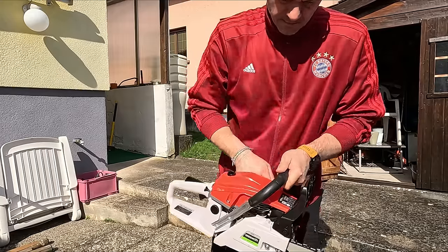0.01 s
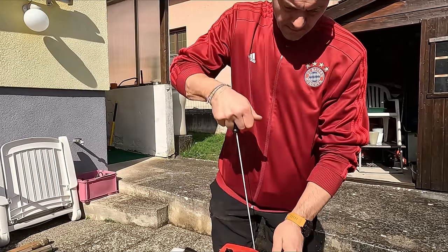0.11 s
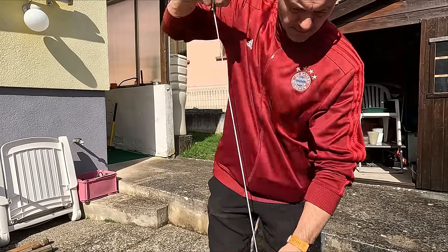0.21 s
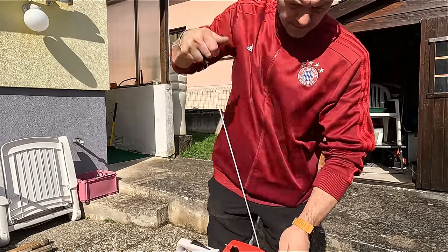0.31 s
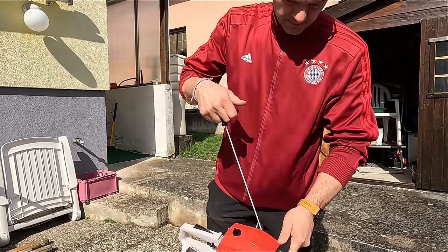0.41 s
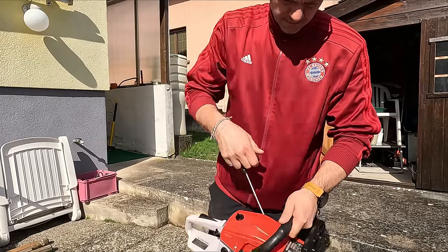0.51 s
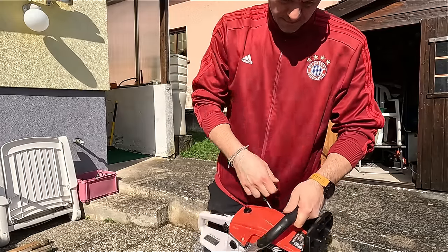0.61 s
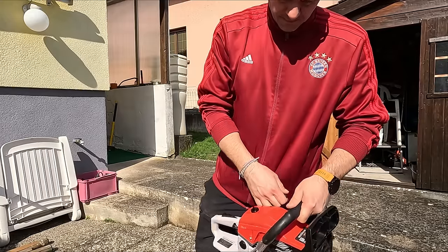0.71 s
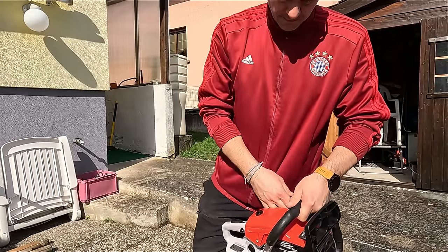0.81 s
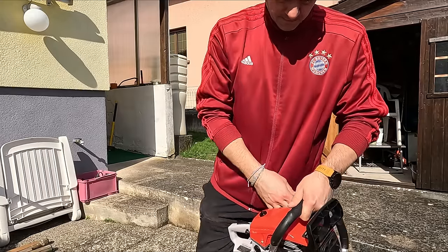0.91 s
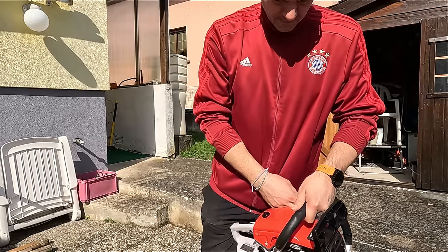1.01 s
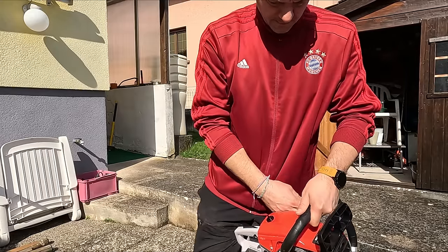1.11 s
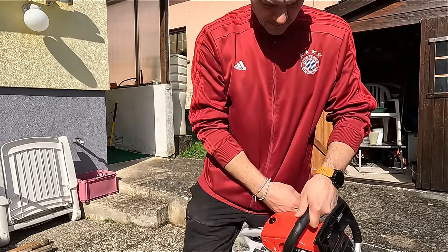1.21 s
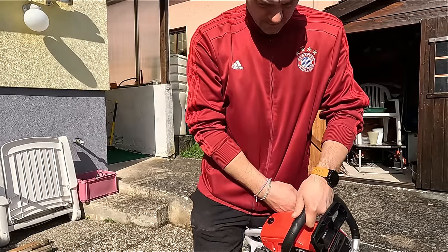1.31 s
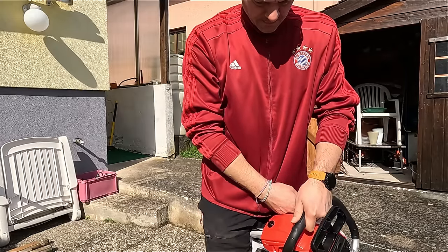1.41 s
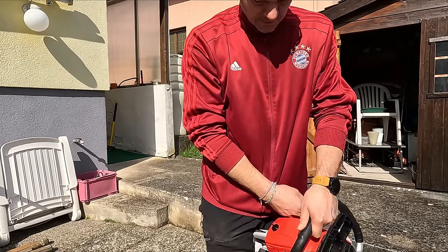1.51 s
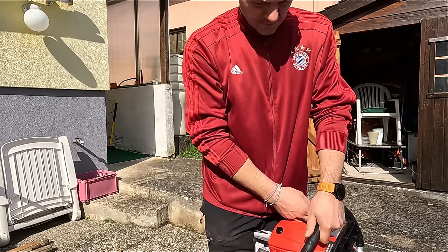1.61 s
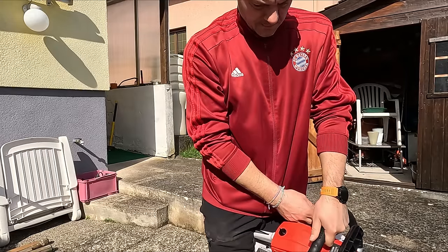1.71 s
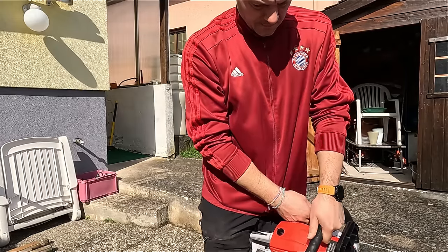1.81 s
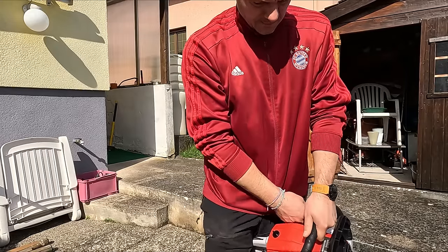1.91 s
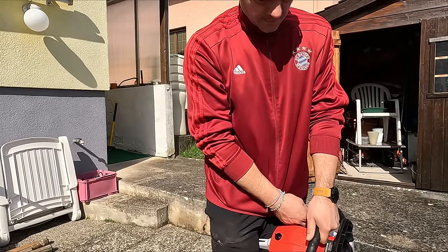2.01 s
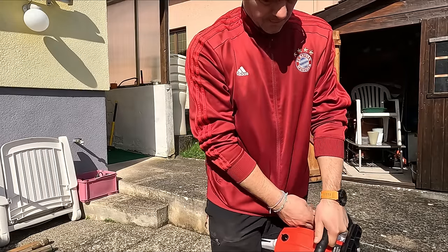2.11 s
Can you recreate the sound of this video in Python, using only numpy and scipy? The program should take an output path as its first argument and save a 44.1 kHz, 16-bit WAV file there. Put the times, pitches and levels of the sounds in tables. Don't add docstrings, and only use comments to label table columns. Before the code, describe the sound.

Small chainsaw starter rope yanked once: pawl click, hollow unfired chugs, rattly rewind, then rustling sleeves

```python
import sys
import numpy as np
from scipy import signal
from scipy.fft import rfft, irfft, next_fast_len
from scipy.io import wavfile
from scipy.ndimage import uniform_filter1d, map_coordinates

SR = 44100
rng = np.random.default_rng(int(sys.argv[2]) if len(sys.argv) > 2 else 0)


def store_wav(level_fs):
    pcm = np.round(np.clip(np.atleast_2d(level_fs), -1, 1) * 32767)
    wavfile.write(sys.argv[1], SR, pcm.T.astype(np.int16))


def boost(x):
    u = np.asarray(x, float) / 20
    return 10 ** u


N = 97020

# (port opens [s], level [dB], port stays open [s], muffler pitch [Hz])
PISTON_STROKES = [(0.23, -15, 0.01, 231), (0.2606, -3.5, 0.015, 222), (.289, -3, 0.0099, 236),
                  (0.3147, -5.5, 0.0109, 235), (0.3447, -6, 0.012, 252), (0.39, -8.5, 0.019, 182.4),
                  (0.408, -10.5, 0.013, 167), (0.447, -11, 0.027, 231), (0.494, -21, 0.019, 127),
                  (0.537, -24, 0.02, 83), (0.588, -25.5, 0.018, 95), (.628, -38.5, .02, 82.7)]
# (frequency [Hz], level [dB])
PUFF_COLOUR = [(150, -29), (400, -7), (900, -17.5), (2500, -26), (9000, -74)]
# (time [s], level [dB], pitch [Hz], T60 [s])
HOUSING_KNOCKS = [(0, -24.5, 1464, 0.059), (.1058, -13.5, 1650, .016), (.111, -25.5, 770, 0.029),
                  (.1205, -18, 2290, 0.014), (.1689, -14, 2620, 0.023), (.1705, -27, 1030, 0.043),
                  (.1785, -15.5, 2250, 0.038), (.204, -16.5, 3070, 0.024), (.2105, -17.5, 1387, 0.041),
                  (.2238, -25, 2500, 0.03), (.2307, -29, 2720, 0.018), (.2377, -10, 2300, 0.022),
                  (.2542, -14, 2480, 0.028), (.2595, -14, 864, .015), (.2806, -13, 3720, 0.023),
                  (.3066, -16, 3500, 0.017), (.3121, -14, 4200, 0.053), (.338, -17, 3000, 0.013),
                  (.383, -24, 1550, 0.026), (.5038, -22, 1760, 0.016), (.5092, -17.5, 1650, 0.038),
                  (.526, -20.5, 3770, 0.017), (.5285, -15.5, 1800, 0.025), (.5452, -14.5, 1130, .03),
                  (.569, -21, 1900, 0.029), (.5975, -20, 1724, 0.061), (.5985, -18.5, 3200, 0.024),
                  (.628, -19.5, 1640, 0.024), (.631, -20, 6200, .02), (.6672, -17, 1070, .035),
                  (0.668, -23, 6030, 0.029), (.6885, -28, 755, 0.026), (.7135, -21.5, 1590, 0.018),
                  (.717, -25.5, 695, 0.08), (.72, -20, 6100, 0.027), (.798, -20, 2350, 0.032),
                  (.8005, -21.5, 3220, 0.033), (.8098, -18.5, 3260, 0.05), (.811, -41, 1150, 0.033),
                  (.823, -39.5, 740, .05)]
# (time [s], pawl level [dB], spring level [dB], cup level [dB], free to ring [s])
STEEL_STRIKES = [(0, -26, -31, -40, .005), (.112, -21, -31, -36, .015), (.179, -15, -50, -44, .009),
                 (.384, -27, -11, -29, .011), (.397, -26, -21, -32, .018), (.42, -28, -12.5, -30, .014),
                 (.436, -36, -28, -29, .02), (.51, -38, -33, -35, .015), (.527, -34, -31, -31, .04),
                 (.555, -38, -28, -36, .015), (.57, -33, -24, -28.5, .045), (.63, -32, -25, -41, .022),
                 (.668, -28, -23, -40, .017), (.716, -24, -22, -34, .045), (.811, -40, -30, -34, .018)]
# (frequency [Hz], level [dB], T60 [s])
PAWL_MODES = [(5170, -3, .045), (6940, -16, .05), (10720, -21, .2), (13230, -33, .2), (6250, -22, .06)]
# (frequency [Hz], level [dB], T60 [s])
SPRING_MODES = [(4350, -2.5, .15), (3835, -12, .2), (3605, -17, .2), (3330, -18, .08), (740, -18, .42),
                (1100, -17.5, .1)]
# (frequency [Hz], level [dB], T60 [s])
CUP_MODES = [(7882, -2.5, .14), (8735, -13, .14), (9055, -11, .1), (10250, -18, .14), (10680, -15, .2),
             (11300, -25, .15), (12200, -27, .15), (12700, -28, .15), (13200, -26, .2), (13800, -32, .15)]
# (frequency [Hz], level [dB])
SCRAPE_COLOUR = [(380, -61), (560, 9.5), (1800, 4.5), (4200, 5.5), (9000, -11.5), (13500, -15.5),
                 (15500, -67)]
# (time [s], level [dB])
ROPE_SPEED = [(.17, -47), (.2, -31), (.26, -25.5), (.33, -20.5), (.43, -24.5), (.47, -36), (.53, -31.5),
              (.68, -33.5), (.79, -47)]
# (frequency [Hz], level [dB])
WHIR_COLOUR = [(350, -13.5), (650, 0), (1700, -0.5), (2700, -1), (5500, -8.5), (8000, -13), (13500, -39),
               (15500, -62)]
# (time [s], level [dB], length [s], pitch [Hz])
FINGER_TAPS = [(0.934, -50, 0.0028, 1790), (.961, -42.5, 0.0063, 1230), (1.987, -29.5, 0.0015, 2470),
               (1.9877, -37, 0.0039, 1230), (1.99, -38, 0.0022, 2600), (1.9965, -32, .002, 2390),
               (1.997, -42, 0.002, 1010), (2.002, -34.5, 0.012, 1150), (1.999, -33.5, 0.02, 2620),
               (2.074, -40, .004, 2770), (2.076, -40, .005, 1210), (2.092, -37.5, 0.017, 2760)]
# (middle [s], level [dB], half
# length [s], pitch [Hz])
SWISHES = [(0.211, -31.5, 0.0089, 557), (0.235, -22, 0.0082, 527), (.255, -20.5, 0.03, 2586),
           (0.32, -24, .008, 6900), (0.344, -30, 0.013, 7160), (0.409, -34, 0.019, 530),
           (0.445, -32, 0.0094, 576), (0.553, -36, 0.033, 600), (0.611, -34, 0.013, 580),
           (0.746, -38, 0.016, 736), (1.227, -48, 0.022, 6300)]
# (frequency [Hz], left minus right [dB])
SAW_TILT = [(60, -0.3), (380, -1), (2380, -2.1), (6000, -1), (15000, 3.5)]
# (frequency [Hz], left leads by [rad])
SAW_LEAD = [(100, 0.055), (1000, -0.23), (5000, -0.76), (10000, 0.05), (12500, -1.5)]
# (frequency [Hz], T60 [s])
WALL_DECAY = [(200, 0.55), (2000, 0.098), (10000, 0.05)]
# (time [s], level [dB])
SLEEVE_MOVES = [(0, -37), (.09, -46), (.86, -75), (.93, -52), (.96, -51.5), (1.1, -50.5), (1.13, -53),
                (1.2, -62), (1.225, -46.5), (1.27, -48.5), (1.33, -45.5), (1.42, -53), (1.54, -46),
                (1.57, -58), (1.88, -54), (1.94, -46), (2.08, -46), (2.2, -47)]
# (frequency [Hz], level [dB])
CLOTH_COLOUR = [(150, 7), (350, 4.5), (1200, 6.5), (3200, 2.5), (5500, -3), (8500, -5.5), (10500, -18),
                (13000, -47)]
# (time [s], level [dB])
GUSTS = [(0.0, -40), (0.18, -52), (0.21, -40), (0.54, -29.5), (0.79, -47), (0.84, -31), (0.88, -45),
         (0.99, -36.5), (1.05, -43), (1.4, -42.5), (1.46, -26.5), (1.49, -36), (1.75, -35), (1.78, -40.5),
         (1.91, -34), (1.96, -45.5), (2.13, -37.5), (2.2, -38)]
# (frequency [Hz], level [dB])
BUFFET_COLOUR = [(12, -11.5), (25, -2.5), (60, -7), (120, -18.5), (250, -39), (600, -71)]
# (frequency [Hz], level [dB])
YARD_COLOUR = [(80, -22), (130, -5), (330, -14.5), (600, -15), (1000, -12.5), (2000, -19.5), (4500, -28.5),
               (9000, -40.5), (13000, -66)]
# (frequency [Hz], left-right likeness [0-1])
YARD_LIKENESS = [(100, 1), (400, 0.81), (2400, 0.36)]


def unit(x):
    return x / np.sqrt(np.mean(x ** 2) + 1e-20)


def along(points, hz):
    f, v = np.transpose(points)
    return np.interp(np.log(hz + 1), np.log(f + 1), v)


def curve(rows):
    s, db = np.transpose(rows)
    before = -120 if s[0] > 0.05 else None
    after = -120 if s[-1] < 2 else None
    return np.interp(np.arange(N) / SR, s, db, left=before, right=after)


def wobble(rate):
    knots = rng.standard_normal(int(N * rate / SR) + 4)
    return map_coordinates(knots, [np.arange(N) * rate / SR])


def filtered(x, response):
    m = next_fast_len(N + SR // 2)
    return irfft(rfft(x, m) * response(np.fft.rfftfreq(m, 1 / SR)), m)[..., :N]


def rush(colour, alike, patchy_db, grain_db=0):
    raw = rng.standard_normal((2, N)) * boost(grain_db * wobble(900))
    z = signal.stft(raw, nperseg=512)[2]
    patches = uniform_filter1d(rng.standard_normal(z.shape[1:]), 6, axis=0)
    patches = uniform_filter1d(patches, 8, axis=1)
    pair = signal.istft(z * boost(patchy_db * unit(patches)), nperseg=512)[1][:, :N]

    def mid_side(hz):
        angle = np.arccos(np.clip(along(alike, hz), -1, 1)) / 2
        return boost(along(colour, hz)) * [np.cos(angle), np.sin(angle)]

    mid, side = filtered(pair, mid_side)
    return unit(np.array([mid + side, mid - side]))


def add(track, s, x):
    part = track[max(round(s * SR), 0):][:len(x)]
    part += x[:len(part)]


def hollow(hz, width, shape):
    raw = shape * rng.standard_normal(len(shape)) * boost(3 * wobble(900)[:len(shape)])
    raw[:3] += 4 * shape[0]
    broad = signal.lfilter(*signal.iirpeak(hz, 0.7, fs=SR), raw)
    out = signal.lfilter(*signal.iirpeak(hz, 1 / width, fs=SR), broad)
    return out / np.abs(out).max()


def piston():
    open_t60, shut_t60 = 0.26, 0.05
    blow_s, steady = 0.0077, 0.49
    suck_turns, suck_db, shut_db, puff_db = 0.46, 1.5, -8, -16
    overtone_db, overtone_t60 = -12.5, 0.064
    case_hz, case_db, case_t60 = 126.9, -14, 0.25
    low_hz = 69
    tone, gate, t = np.zeros(N), np.zeros(N), np.arange(SR // 8) / SR
    for s, db, open_s, hz in PISTON_STROKES:
        fade = boost(-60 * np.minimum(t, open_s) / open_t60 - 60 * np.maximum(t - open_s, 0) / shut_t60)
        fade *= steady + (1 - steady) * np.exp(-(t / blow_s) ** 2)
        turn = 2 * np.pi * hz * t
        overtone = boost(overtone_db - 60 * t / overtone_t60) * np.sin(2 * turn)
        case = boost(case_db - 60 * t / case_t60) * np.sin(2 * np.pi * case_hz * t)
        blow = fade * (np.sin(turn) + overtone) + case
        suck_s = suck_turns / hz
        suck = -boost(suck_db) * np.sin(np.pi * np.clip(t / suck_s, 0, 1))
        add(tone, s - suck_s + 0.0012, boost(db) * suck)
        add(tone, s + 0.001, boost(db) * blow)
        add(tone, s + open_s, boost(db + shut_db) * suck * 2)
        add(gate, s - suck_s, boost(db + puff_db) * fade)
    puff = gate * unit(filtered(rng.standard_normal(N), lambda hz: boost(along(PUFF_COLOUR, hz))))

    def bass_limit(hz):
        return hz / (hz - 1j * low_hz) * hz ** 4 / (hz ** 4 + low_hz ** 4)

    return filtered(tone + puff, bass_limit)


def ringing(modes, t):
    out = 0
    for hz, db, t60 in modes:
        level = db + rng.normal(0, 1) + 1.2 * wobble(90)[:len(t)] - 60 * t / t60
        phase = rng.uniform(0, 2 * np.pi) + 0.33 * wobble(145)[:len(t)]
        out = out + boost(level) * np.sin(2 * np.pi * hz * t + phase)
    return out


def steel_response(f):
    out = 0
    for hz, db, t60 in SPRING_MODES + PAWL_MODES + CUP_MODES:
        damping = 1j * f * 4 / t60
        out = out + boost(db) * damping / (hz * hz - f * f + damping)
    return out


def knocks_and_scrapes():
    taut_s, slack_s, tight_db = 0.2, 0.38, -8
    knock_db, scrape_db, scrape_t60, scrape_rise_s = -0.5, -16, 0.092, 0.00052
    body, scrape, t = np.zeros(N), np.zeros(N), np.arange(SR // 6) / SR
    for s, db, hz, t60 in HOUSING_KNOCKS:
        width = np.clip(0.14 * 0.025 / t60, 0.05, 0.3)
        add(body, s, boost(db + knock_db) * hollow(hz, width, boost(-60 * t / t60)))
        level = db + scrape_db + tight_db * (taut_s < s < slack_s)
        add(scrape, s, boost(level - 60 * t / scrape_t60) * (1 - np.exp(-t / scrape_rise_s)))
    return body + scrape * rush(SCRAPE_COLOUR, [(1000, 1)], patchy_db=1.2, grain_db=2)[0]


def struck_steel():
    held_t60, held_floor_db = 0.0094, -10
    ring_db, rise_s = 3, 0.002
    wound_till_s, wound_sag = 0.45, 0.978
    out, t = np.zeros(N), np.arange(SR // 6) / SR
    for s, pawl_db, spring_db, cup_db, free_s in STEEL_STRIKES:
        damped_db = np.maximum(-60 * np.maximum(t - free_s, 0) / held_t60, held_floor_db)
        held = boost(ring_db + damped_db) * (1 - np.exp(-t / rise_s))
        pawl = boost(pawl_db) * ringing(PAWL_MODES, t)
        spring = boost(spring_db) * ringing(SPRING_MODES, t * (wound_sag if s < wound_till_s else 1))
        cup = boost(cup_db) * ringing(CUP_MODES, t)
        add(out, s, held * (pawl + spring + cup))
    return out


def running_rope():
    rattle_db, tight_db, slack_s = -5, -8, 0.38
    whir = rush(WHIR_COLOUR, [(1000, 1)], patchy_db=1.5, grain_db=2)[0]
    speed = boost(curve(ROPE_SPEED) + 0.8 * wobble(60))
    grit = speed * rng.standard_normal(N) * boost(3 * wobble(300))
    steel_gain = np.std(filtered(rng.standard_normal(N), steel_response))
    rattle = filtered(grit, steel_response) / steel_gain / 2
    return speed * whir + boost(rattle_db + tight_db * (np.arange(N) < slack_s * SR)) * rattle


def fingers_and_rubs():
    out, t = np.zeros(N), np.arange(SR // 6) / SR
    for s, db, length_s, hz in FINGER_TAPS:
        add(out, s, boost(db + 5.5) * hollow(hz, 0.24, np.exp(-(t / length_s) ** 4)))
    for s, db, half_s, hz in SWISHES:
        add(out, s - 2 * half_s, boost(db + 9) * hollow(hz, 0.11, np.exp(-(t / half_s - 2) ** 2)))
    return out


def saw_in_stereo(near):
    side = np.array([[0.5], [-0.5]])

    def place(hz):
        return boost(side * along(SAW_TILT, hz)) * np.exp(1j * side * along(SAW_LEAD, hz))

    return filtered(near[None], place)


def walls(near):
    delay_s, low_hz, bright_hz, level_db = 0.006, 600, 9400, -17
    back = filtered(near, lambda hz: (hz / (hz - 1j * low_hz)) ** 2 * (1 + (hz / bright_hz) ** 4))
    hz, t, z = signal.stft(rng.standard_normal((2, SR // 4)), SR, nperseg=256)
    decay = boost(-60 * t / along(WALL_DECAY, hz)[:, None])
    tail = signal.istft(z * decay, SR, nperseg=256)[1]
    delayed = np.pad(back, (round(delay_s * SR), 0))[None]
    return boost(level_db) * signal.fftconvolve(delayed, tail / np.linalg.norm(tail[0]), axes=1)[:, :N]


def sleeves():
    cloth = rush(CLOTH_COLOUR, [(2000, 0.81), (10000, 1.0)], patchy_db=3.0, grain_db=1.15)
    return boost(curve(SLEEVE_MOVES) + 0.62 * wobble(29.3)) * cloth


def wind():
    steadied_s = 0.05
    buffet = rush(BUFFET_COLOUR, [(25, 0.58), (120, 0.97)], patchy_db=-0.5)
    power = uniform_filter1d(np.mean(buffet ** 2, axis=0), round(steadied_s * SR))
    return boost(curve(GUSTS)) * buffet / np.sqrt(np.abs(power) + 0.05)


def yard():
    return boost(-49 + 0.13 * wobble(3.6)) * rush(YARD_COLOUR, YARD_LIKENESS, patchy_db=-1.4)


def scene():
    near = piston() + knocks_and_scrapes() + struck_steel() + running_rope() + fingers_and_rubs()
    return saw_in_stereo(near) + walls(near) + sleeves() + wind() + yard()


def roll_off(x):
    return signal.sosfilt(signal.butter(12, 16010, fs=SR, output="sos"), x)


def record(dry):
    top_hz, notch_hz, notch_width_hz, notch_depth = 15900, 9650, 300, 0.7

    def limit_and_dip(hz):
        dip = 1 - notch_depth * np.exp(-((hz - notch_hz) / notch_width_hz) ** 2)
        return (hz < top_hz) * dip

    mix = np.clip(filtered(dry, limit_and_dip), -1, 1)
    return roll_off(mix)


dry = scene()
out = record(dry)
store_wav(out)
```